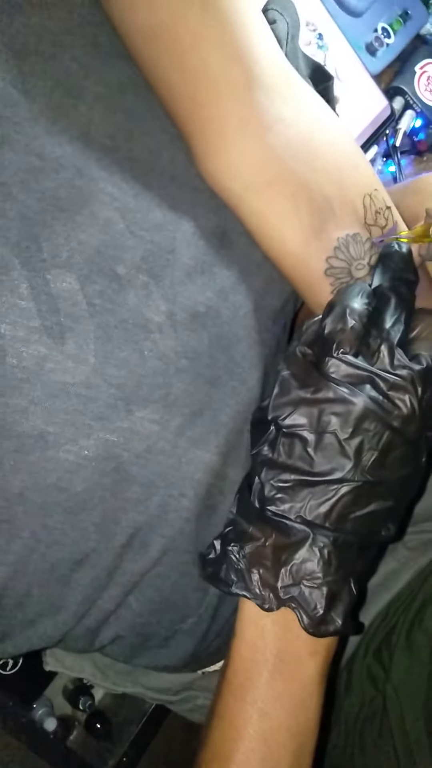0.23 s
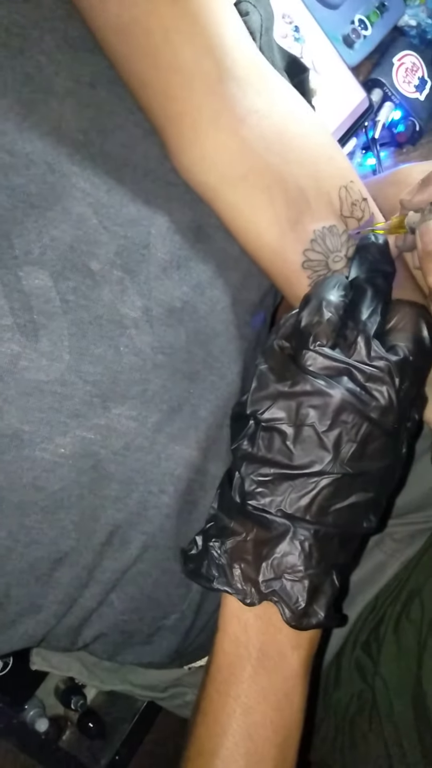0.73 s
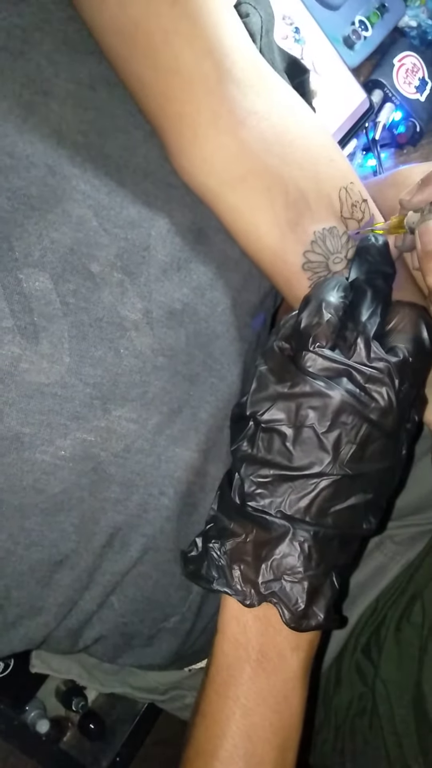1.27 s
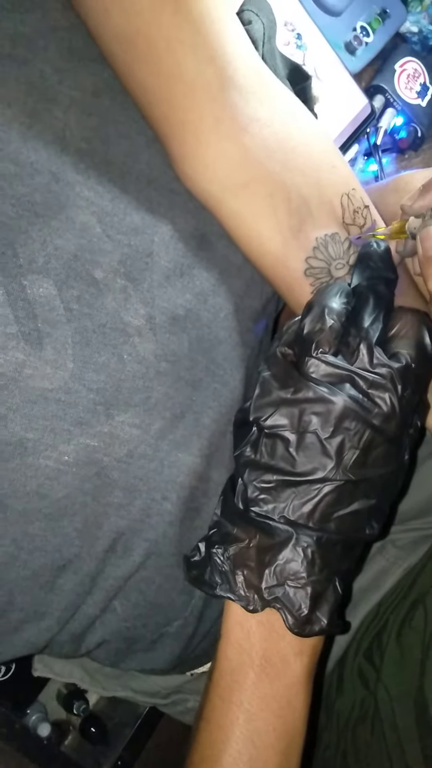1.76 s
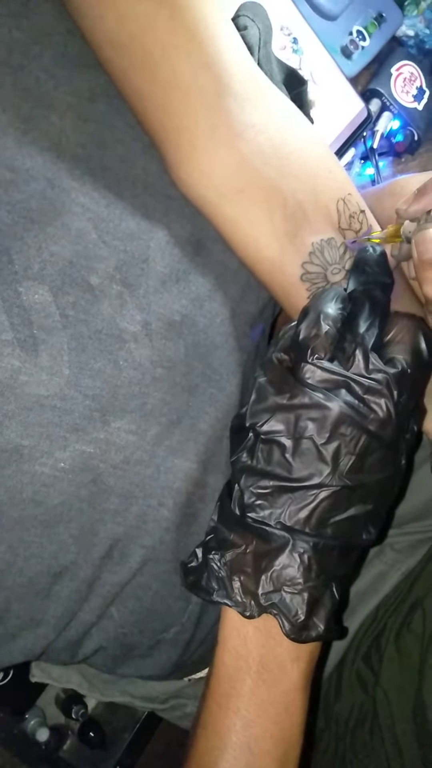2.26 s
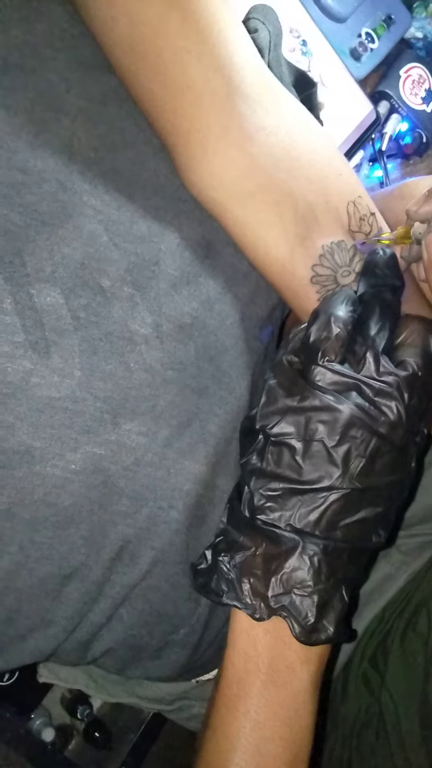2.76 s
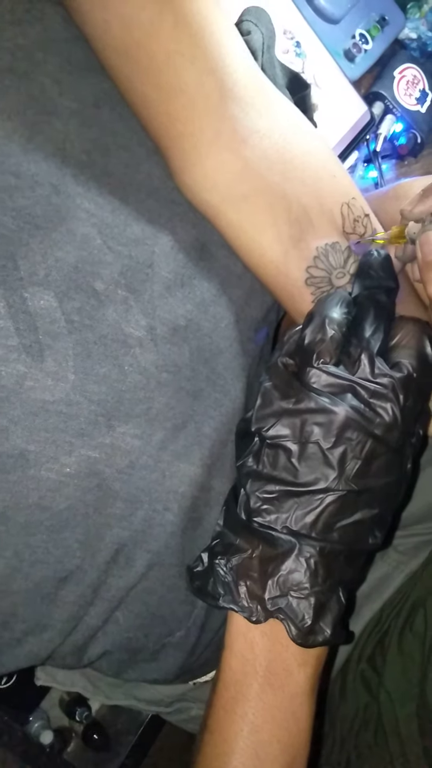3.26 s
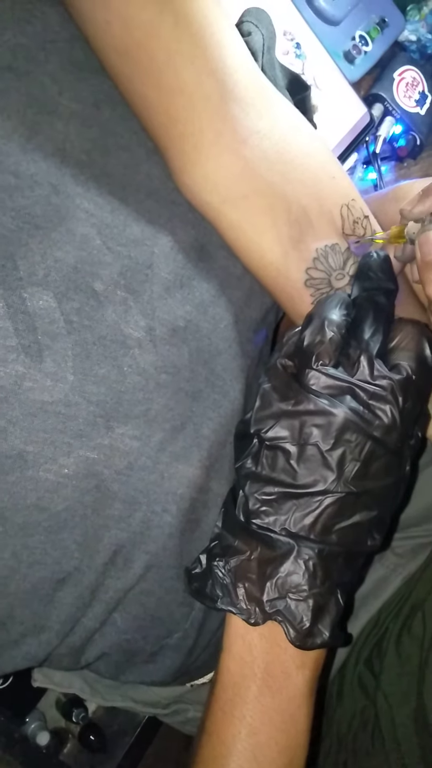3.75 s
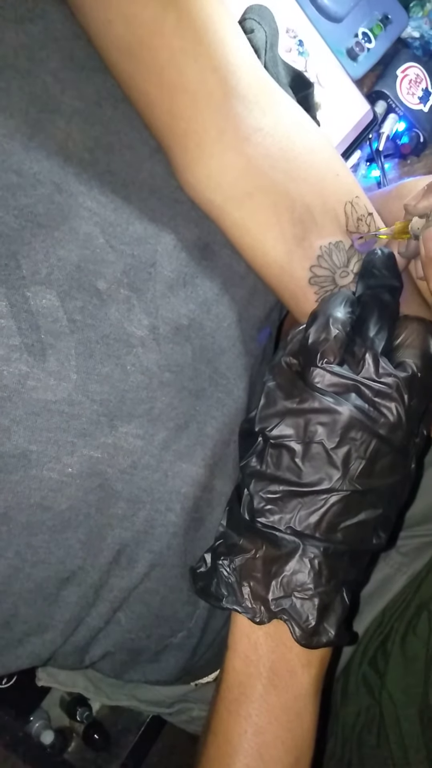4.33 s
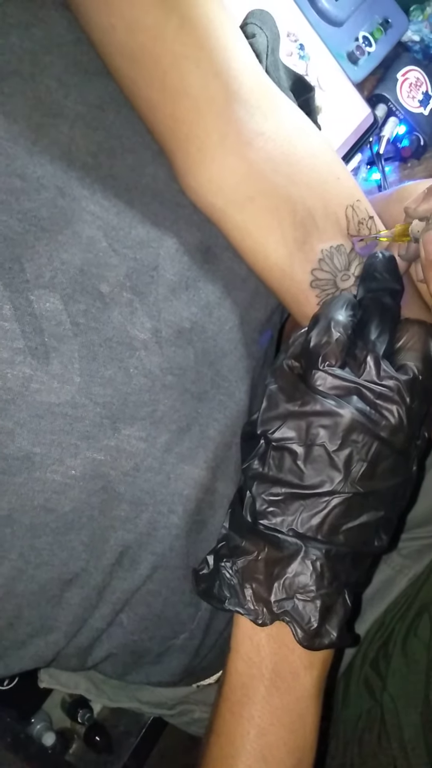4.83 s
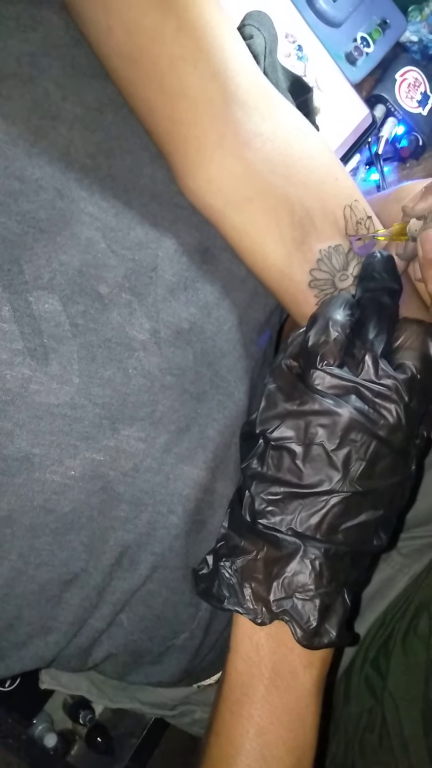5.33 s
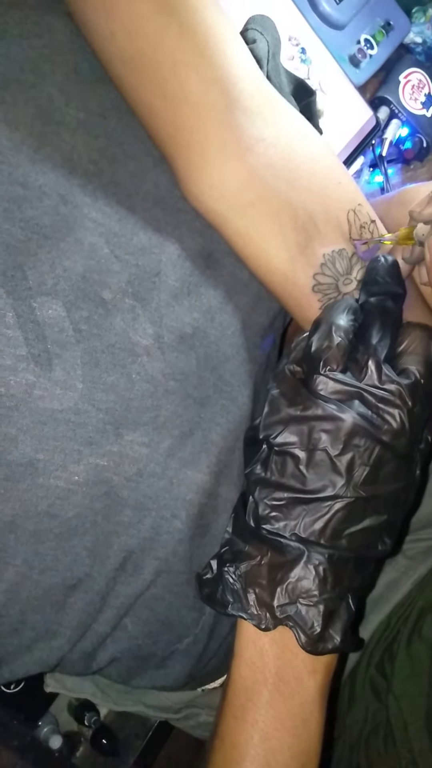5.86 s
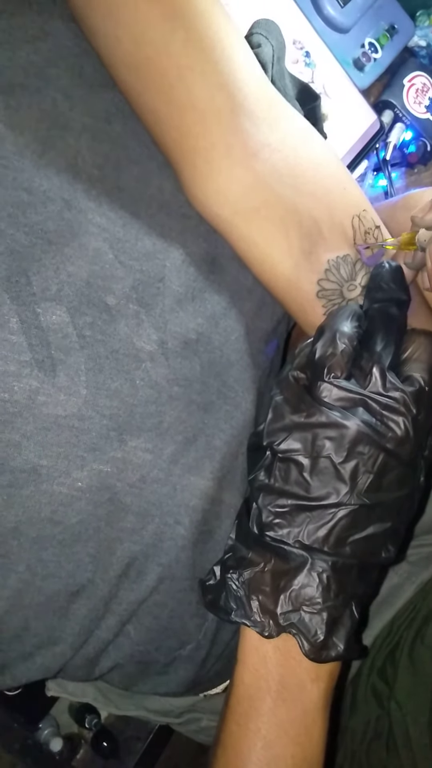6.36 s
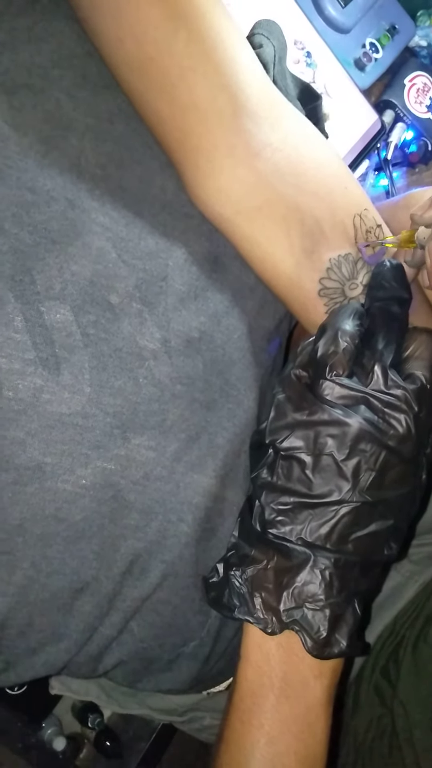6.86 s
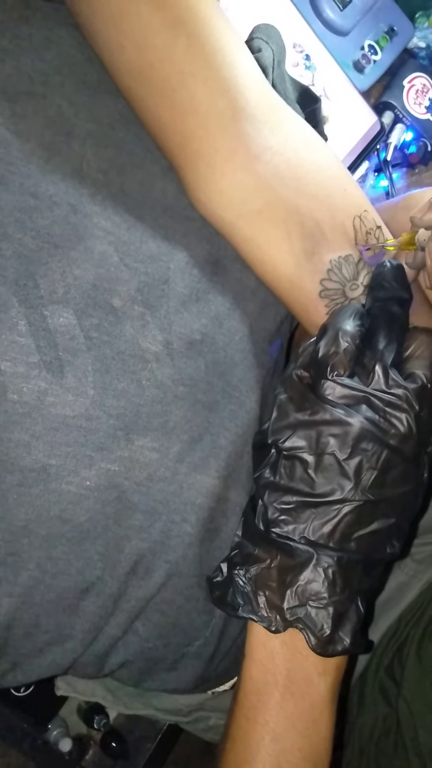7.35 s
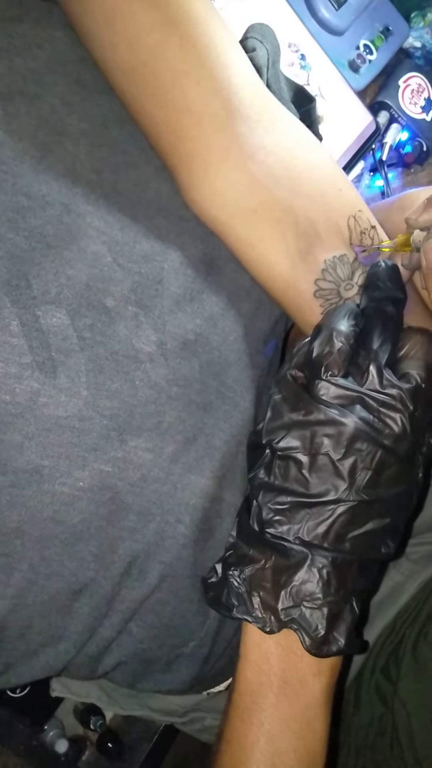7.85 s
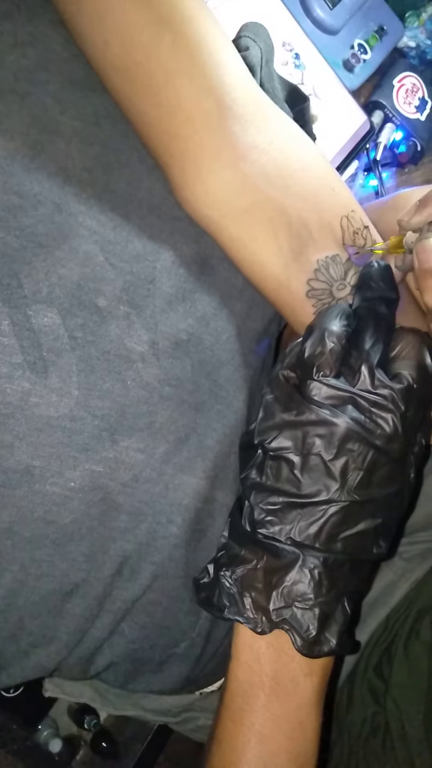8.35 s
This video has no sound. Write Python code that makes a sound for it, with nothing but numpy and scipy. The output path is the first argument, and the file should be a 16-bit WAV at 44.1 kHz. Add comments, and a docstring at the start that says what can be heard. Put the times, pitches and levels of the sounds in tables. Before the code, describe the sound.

Close, raspy metallic buzzing from a tattoo machine that stops and stutters at first, then runs on, with a few soft knocks underneath.

```python
"""Tattoo machine in a small room

A coil tattoo machine buzzes close by: its armature, a small steel bar, slams and bounces about 105
times a second, shaking the frame and ringing the steel parts. It stops and stutters at the start, and
later bogs down as the needle presses into the skin. Under it lie a few soft knocks, two faint double
chirps, the room's hiss and low hum, and a little handling rumble."""
import sys
import numpy as np
from scipy import signal
from scipy.fft import rfft, irfft, next_fast_len
from scipy.io import wavfile
from scipy.ndimage import map_coordinates

SR = 44100
rng = np.random.default_rng(int(sys.argv[2]) if len(sys.argv) > 2 else 0)


def wav_out(sig):
    """Save sig, one row per channel (or a flat mono array), as 16-bit PCM at SR to the path in sys.argv[1]."""
    wavfile.write(sys.argv[1], SR, np.round(np.clip(np.atleast_2d(sig).T, -1, 1) * 32767).astype(np.int16))


N = 378819
FREE_DB, FREE_HZ = -31.5, 104.75  # strength and stroke rate when the machine runs freely


def tattoo_machine(creep_hz_per_s=0.04, sag_hz_per_db=0.45, free_buzz_db=-49.2):
    """Pressing into the skin makes the strokes slower, weaker and more rattly."""
    load_db = skin_load()
    drag_db = np.maximum(load_db, 0)
    phase, drive, blows = armature(FREE_HZ + creep_hz_per_s * clock() - sag_hz_per_db * drag_db)
    looseness = np.minimum(0.82 * np.exp(0.36 * load_db), 1.6)  # multiplies the timing scatter
    buzz = frame_buzz(phase, drive * amp(free_buzz_db - 0.9 * drag_db))
    buzz = room(buzz, wet_db=-12)
    clash = steel_clash(blows, drive * amp(FREE_DB - load_db), looseness)
    return buzz + arm_reflections(clash)


def skin_load(tremor_db=0.23, tremors_per_s=9):
    """The strength lost to the skin, in dB; it trembles with the hand."""
    # how hard the armature strikes: time_s, strength_db
    strike = [(0.55, -31.5), (0.82, -33.5), (1.45, -32), (1.56, -33.5), (2.46, -32.0), (2.82, -33.7),
              (3.43, -31.0), (4.38, -34), (4.79, -33.5), (4.99, -36), (5.22, -41.5), (5.55, -36.5),
              (5.72, -31.5), (5.93, -30.0), (6.3, -32), (6.69, -31.0), (7.24, -33), (8.56, -31)]
    return FREE_DB - over_time(strike) + tremor_db * wobble(tremors_per_s)


def armature(rate_hz, flutter=0.001092, slowing_per_db=0.0046):
    """The bar hammers in spells. Gives the running stroke count, its strength and the blow times."""
    # spells of full or stuttering hammering: start_s, end_s, strength_db
    spells = [(0.003, 0.096, -1.5), (0.2755, 0.322, -20), (0.4905, 0.514, -19), (0.5175, 5.205, 0),
              (5.21, 5.226, -11), (5.231, 8.6, 0)]
    t = clock()
    strokes = np.cumsum(rate_hz * (1 + flutter * wobble(40))) / SR
    phase, drive, blows = np.zeros(N), np.zeros(N), []
    for start, end, db in spells:
        on = (t >= start - .001) & (t < end)
        # every spell begins with a blow, and a weak pull runs slower
        count = (strokes - np.interp(start, t, strokes)) * (1 + slowing_per_db * db)
        phase[on], drive[on] = count[on], amp(db)
        whole_strokes = np.arange(np.interp(end, t, count))
        blows.append(np.interp(whole_strokes, count, t))
    return phase, drive, np.concatenate(blows)


def steel_clash(blows, force, looseness, trim_db=0.4, grit_db=-12, grit_ms=0.85, tube_db=-27):
    """The contacts ring the steel, and after each one the needle bar rasps in its tube."""
    # ringing tones of the armature, springs and tube: pitch_hz, width_hz, level_db
    steel_tones = [(3014, 170, -16.5), (3260, 210, -24.5), (3666, 270, -16.5), (4000, 280, -20),
                   (4427, 264, -19.5), (5030, 550, -22), (5390, 290, -17), (5900, 365, -15.5),
                   (6454, 280, -12), (7120, 320, -15), (7770, 430, -12.5), (8230, 1300, -13.5),
                   (8920, 890, -17.5), (9580, 820, -14.5), (10490, 360, -11), (11024, 380, -4.8),
                   (12020, 450, -6.5), (12510, 580, -9), (13700, 800, -7), (14200, 360, -5),
                   (15500, 516, .8), (14880, 520, -1)]
    hits = contacts(blows, force, looseness)
    fade = np.exp(-1000 / (grit_ms * SR))
    fading_energy = signal.lfilter([1 - fade], [1, -fade], hits ** 2)
    scrape = np.sqrt(fading_energy) * rng.standard_normal(N)
    steel = unit(signal.oaconvolve(hits + amp(grit_db) * scrape, ringing(steel_tones))[:N])
    tube = unit(signal.oaconvolve(scrape, ringing([(3000, 1100, 0)]))[:N])  # one broad tone
    clash = unit(room(steel + amp(tube_db) * tube, wet_db=-3.5))
    return amp(trim_db) * np.sqrt(np.mean(force ** 2)) * clash


def contacts(blows, force, looseness, scatter_db=0.5, drift_ms=0.011):
    """Each stroke is a quick run of metal clicks, less evenly timed under load."""
    # the blow, its bounces and the return: delay_ms, level_db, scatter_ms
    clicks = [(0, -3.5, 0.012), (1.368, -5.5, 0.015), (2.052, -5, 0.018), (4.3, -12, 0.029),
              (6.2, -12, 0.036)]
    index = np.minimum((blows * SR).astype(int), N - 1)
    hits = np.zeros(N)
    for delay_ms, db, scatter_ms in clicks:
        late, louder = rng.standard_normal((len(blows), 2)).T
        drift = drift_ms * np.sqrt(delay_ms) * wobble(2.2)[index]
        times = blows + (delay_ms + drift + scatter_ms * looseness[index] * late) / 1000
        sizes = force[index] * amp(db + scatter_db * louder)
        hits += smear(pulses(times, sizes), spread_ms=0.66)
    return hits


def frame_buzz(phase, force, trim_db=-3.5, spread_rad=0.25, lag_ms=0.742, waver_db=1.1):
    """The frame rings after each blow, at whole multiples of the stroke rate."""
    # tones of the shaking frame: rate_multiple, level_db
    frame_tones = [(1, -14), (2, -25.5), (3, -32.5), (4, -26.5), (5, -36.5), (6, -34), (7, -26.5),
                   (8, -21.5), (9, -11.5), (10, -8.3), (11, -23), (12, -19), (13, -8.5), (14, -10.3),
                   (15, -21), (16, -32), (17, -16), (18, -20.5), (19, -14), (20, -20), (21, -17),
                   (22, -7.5), (23, -11.5), (24, -19), (25, -8.5), (26, -15), (27, -3), (28, -5),
                   (29, -1.5), (30, -6)]
    multiples, levels = np.transpose(frame_tones)
    response_db = np.interp(np.arange(65), multiples, levels, right=np.median(levels))
    angles = np.angle(struck_response(amp(response_db)))
    buzz = np.zeros(N)
    for multiple, db in frame_tones:
        late = 2 * np.pi * multiple * FREE_HZ * lag_ms / 1000
        angle = angles[round(multiple)] - late + spread_rad * rng.standard_normal()
        buzz += amp(db + waver_db * wobble(5)) * np.cos(2 * np.pi * multiple * phase + angle)
    return amp(trim_db) * force * unit(buzz)


def arm_reflections(x, fade_s=0.17):
    """Sound bouncing off the arm and glove cancels narrow bands, which shift with the grip."""
    # cancelled bands: start_s, end_s, pitch_hz, width_hz
    bands = [(0, 3.9, 4160, 60.4), (0, 5.5, 4610, 105), (5.701, 8.6, 4800, 115), (6.9, 7.6, 4290, 52)]
    for start, end, pitch_hz, width_hz in bands:
        inside_s = np.minimum(clock() - start, end - clock())
        depth = np.clip(1 + inside_s / fade_s, 0, 1)
        x = x - depth * filtered(x, lambda hz: hump(hz, pitch_hz, width_hz))
    return x


def knocks(trim_db=1, rattle=0.21, rattle_s=0.0017, thud_after_s=0.00403, thud_hz=620, thud_width_hz=540):
    """Each knock is a tap and a soft rattle that ring very briefly, followed by a low thud."""
    # soft knocks nearby: start_s, level_db, pitch_hz, width_hz, thud_db (compared with the knock)
    events = [(0.351, -49.5, 1110, 900, -2), (1.002, -36, 1388, 1200, -2.5),
              (1.060, -33.5, 1960, 1200, -22), (1.267, -45, 2050, 700, -20), (1.624, -37.5, 1660, 950, -11),
              (6.011, -45, 918, 1300, -12), (6.230, -43, 1251, 1202, -15), (6.282, -42, 1600, 1400, -18),
              (7.697, -37.5, 1380, 1000, -21), (7.852, -45, 470, 383, -15)]
    out, t = np.zeros(N + SR), np.arange(SR // 20) / SR
    rattle_shape = rattle * t / rattle_s * np.exp(-t / rattle_s)
    for start, db, pitch_hz, width_hz, thud_db in events:
        knock = (start, db, pitch_hz, width_hz)
        thud = (start + thud_after_s, db + thud_db, thud_hz, thud_width_hz)
        for at, level, hz, width in (knock, thud):
            tap = (t == 0) + rattle_shape * rng.standard_normal(len(t))
            ring = signal.fftconvolve(tap, ringing([(hz, width / 2, 0)]))
            out[round(at * SR):][:len(ring)] += amp(level + trim_db) * ring / np.abs(ring).max()
    return room(out[:N], wet_db=-9)


def chirps(pitch_hz=6300, width_hz=280):
    """A narrow band of noise swells into two faint double chirps."""
    # single chirps: middle_s, spread_s, level_db
    peeps = [(0.256, 0.0085, -64), (0.276, .009, -58), (0.385, 0.0072, -66), (0.41, 0.016, -60)]
    swell = sum(amp(db) * np.exp(-.5 * ((clock() - middle) / spread) ** 2) for middle, spread, db in peeps)
    return room(swell * noise_band(pitch_hz, width_hz), wet_db=-7)


def room_air(level_db=-62):
    """The still room hisses softly, with a faint steady ringing in it."""
    # tone colour of the hiss: pitch_hz, level_db
    hiss = [(20, 7.5), (45, -2.5), (85, 3.5), (125, 2.5), (170, -4), (300, -10), (430, -8), (700, -12.5),
            (1800, -15.5), (4300, -30), (8500, -21.5), (15000, -25)]
    # ringing in the hiss: pitch_hz, width_hz, level_db
    rings = [(2500, 140, -7.5), (6300, 440, -8.5), (6800, 210, -17)]

    def colour(hz):
        return amp(over_pitch(hiss, hz)) + sum(amp(db) * hump(hz, pitch, width) for pitch, width, db in rings)
    return amp(level_db) * unit(filtered(rng.standard_normal(N), colour))


def mains_hum():
    """The electric supply hums in two low, gently wavering tones."""
    # hum tones: pitch_hz, level_db
    tones = [(120, -74), (240, -82.5)]
    return sum(np.sqrt(2) * amp(db + wobble(3.3)) * np.sin(2 * np.pi * hz * clock()) for hz, db in tones)


def handling_rumble():
    """A hand's movement makes a deep rumble that rises near the end."""
    # loudness of the rumble: time_s, level_db
    levels = [(0, -92), (8.1, -84), (8.25, -61.5), (8.59, -65)]
    return amp(over_time(levels)) * noise_band(pitch_hz=28, width_hz=22)


def room(x, wet_db):
    """Add the echo from the walls, which dies fastest in the treble."""
    # time the echo takes to fade by 60 dB: pitch_hz, fade_s
    walls = [(300, 0.5), (3000, 0.3), (14000, 0.22)]
    hz, t, noise = signal.stft(rng.standard_normal(SR // 2), SR, nperseg=256)
    fade = amp(-60 * t / over_pitch(walls, hz)[:, None])
    tail = signal.istft(noise * fade, SR, nperseg=256)[1]
    echo = signal.fftconvolve(np.pad(x, (130, 0)), tail / np.linalg.norm(tail))[:N]  # about 3 ms late
    return (x + amp(wet_db) * echo) / np.hypot(1, amp(wet_db))


def ringing(tones, size=4096):
    """The ring after one tap on a body with these (pitch_hz, width_hz, level_db) tones."""
    hz = np.fft.rfftfreq(size, 1 / SR)
    power = sum((amp(db) * hump(hz, pitch, width)) ** 2 for pitch, width, db in tones)
    return irfft(struck_response(np.sqrt(power)))


def struck_response(gain):
    """Give these gains the phases of a body that rings only after it is struck."""
    cepstrum = irfft(np.log(gain + 1e-6))
    half = cepstrum[:len(cepstrum) // 2]
    return np.exp(rfft(np.r_[half[0], 2 * half[1:]], len(cepstrum)))


def pulses(times, sizes):
    """Clean clicks that can fall between samples."""
    at = times[:, None] * SR
    taps = np.floor(at).astype(int) + np.arange(-7, 9)
    shape = np.sinc(taps - at) * np.cos(np.pi * (taps - at) / 16) ** 2
    return np.bincount(np.clip(taps, 0, N).ravel(), (sizes[:, None] * shape).ravel(), N + 1)[:N]


def smear(x, spread_ms, size=512):
    """Spread clicks into short metallic bursts, keeping their tone colour."""
    half, lead = size // 2, size // 16
    fade = np.exp(-np.arange(half) * 1000 / (spread_ms * SR))
    spectrum = rfft(rng.standard_normal(half) * fade, size)
    burst = np.roll(irfft(spectrum / np.abs(spectrum)), lead)[:half]
    return signal.oaconvolve(x, burst)[lead:][:N]


def noise_band(pitch_hz, width_hz):
    """Steady noise around one pitch."""
    return unit(filtered(rng.standard_normal(N), lambda hz: hump(hz, pitch_hz, width_hz)))


def filtered(x, gain_at):
    """Scale each frequency in x by gain_at(hz)."""
    size = next_fast_len(N + SR // 2)
    return irfft(rfft(x, size) * gain_at(np.fft.rfftfreq(size, 1 / SR)), size)[:N]


def hump(hz, pitch_hz, width_hz):
    """A gain of 1 at one pitch, falling away on both sides."""
    return 1 / (1 + 2 * ((hz - pitch_hz) / width_hz) ** 2)


def wobble(changes_per_s):
    """A smooth random curve."""
    points = rng.standard_normal(int(N * changes_per_s / SR) + 4)
    coarse = clock()[::64]
    return np.interp(clock(), coarse, map_coordinates(points, [coarse * changes_per_s]))


def over_pitch(points, hz):
    """Join (pitch_hz, value) points on a log pitch scale."""
    pitches, values = np.transpose(points)
    return np.interp(np.log(hz + 1), np.log(pitches + 1), values)


def over_time(points):
    """Join (time_s, value) points into one value per sample."""
    return np.interp(clock(), *np.transpose(points))


def clock():
    """The time of every sample, in seconds."""
    return np.arange(N) / SR


def amp(db):
    """Turn decibels into a gain."""
    return 10 ** (np.asarray(db) / 20)


def unit(x):
    """Scale to an average (rms) level of 1."""
    return x / np.sqrt(np.mean(x ** 2) + 1e-20)


def scene():
    """The machine over the small sounds of the room, in one channel."""
    return (tattoo_machine() + knocks() + chirps() + room_air() + mains_hum() + handling_rumble())[None]


def record(dry):
    """Cut off the very highest treble."""
    top_hz, slope_hz = 15800, 200
    return filtered(dry[0], lambda hz: np.clip((top_hz - hz) / slope_hz + .5, 0, 1))[None]


dry = scene()
out = record(dry)
wav_out(out)
```